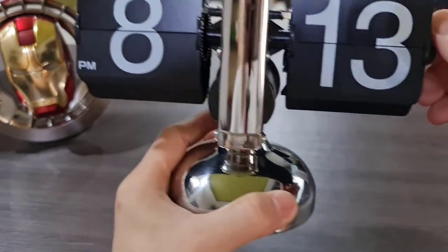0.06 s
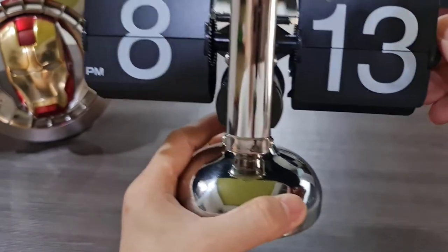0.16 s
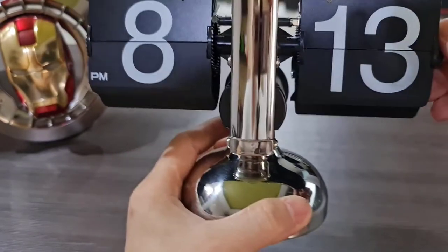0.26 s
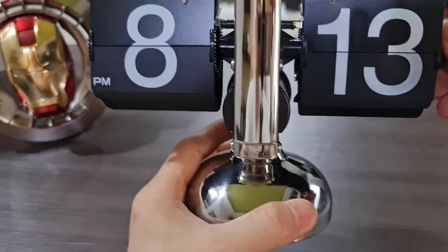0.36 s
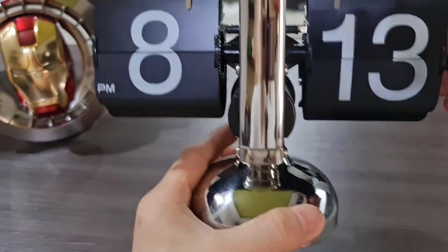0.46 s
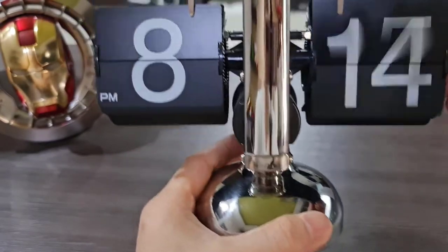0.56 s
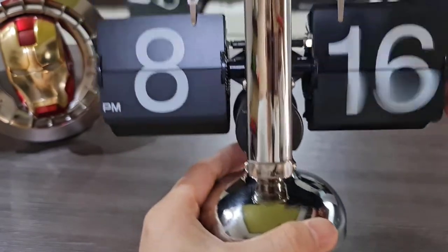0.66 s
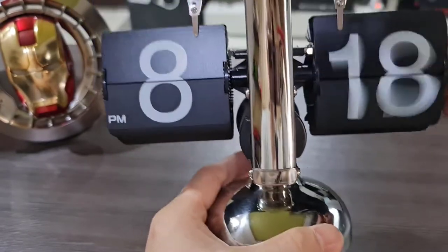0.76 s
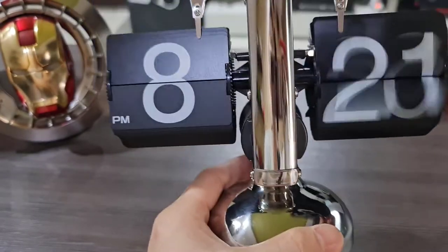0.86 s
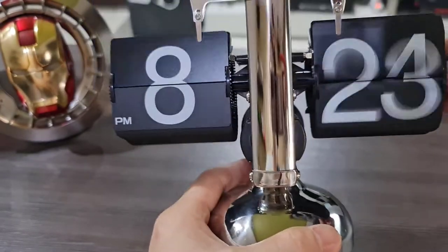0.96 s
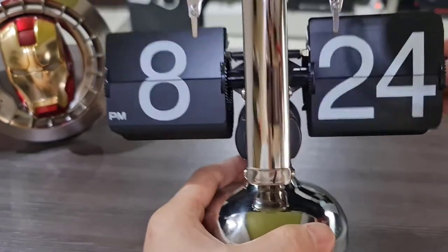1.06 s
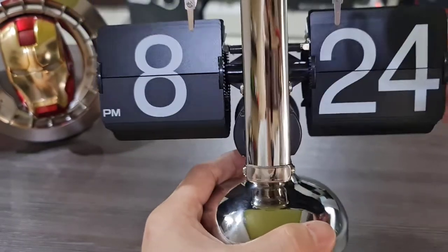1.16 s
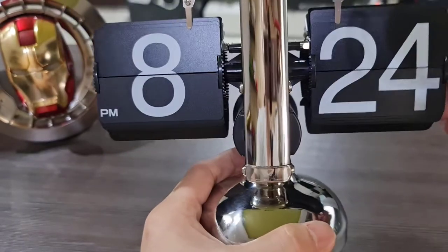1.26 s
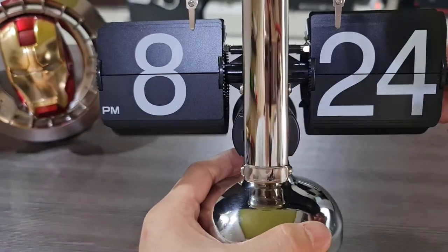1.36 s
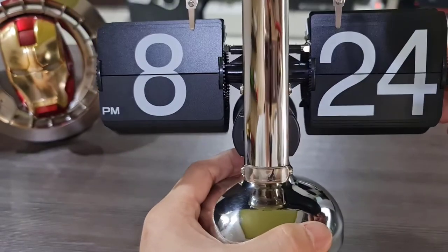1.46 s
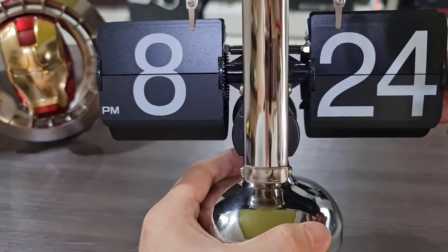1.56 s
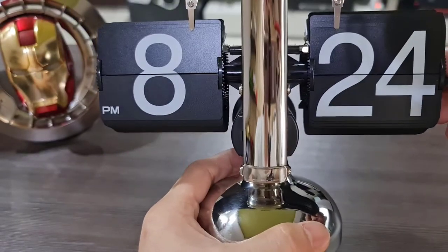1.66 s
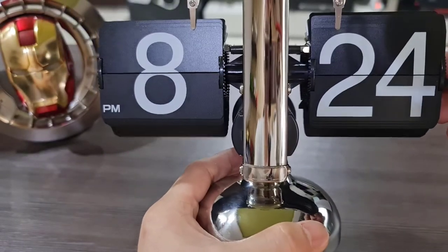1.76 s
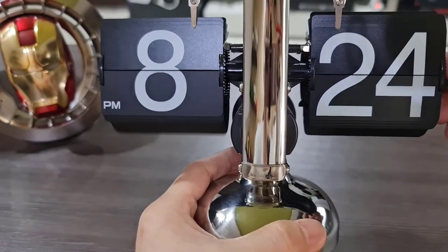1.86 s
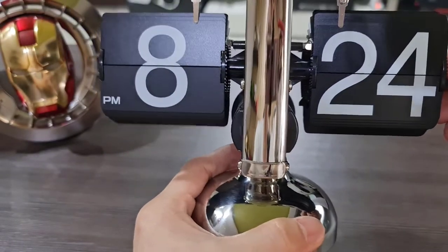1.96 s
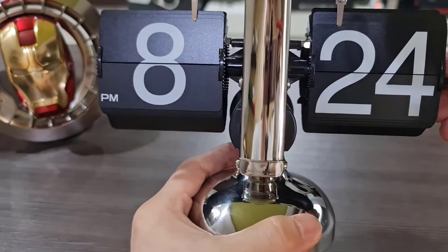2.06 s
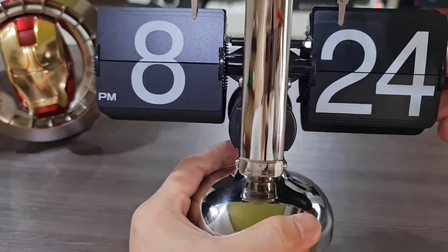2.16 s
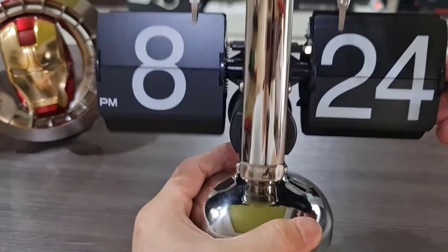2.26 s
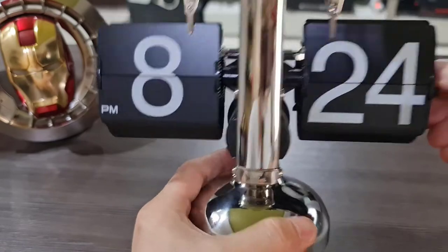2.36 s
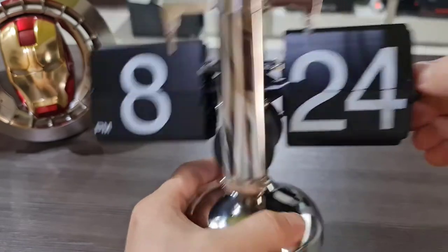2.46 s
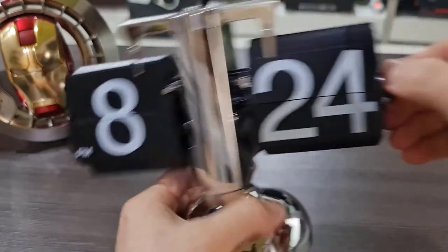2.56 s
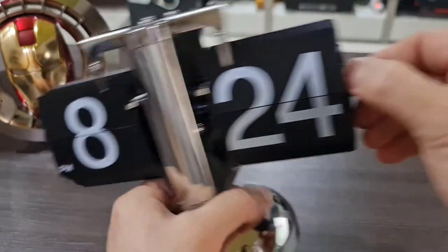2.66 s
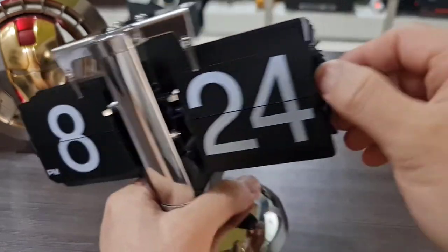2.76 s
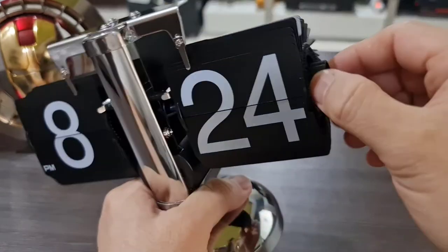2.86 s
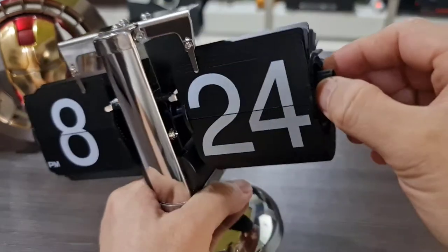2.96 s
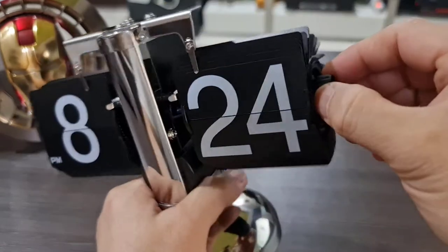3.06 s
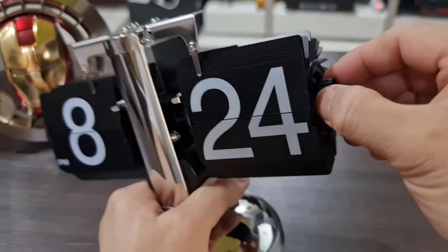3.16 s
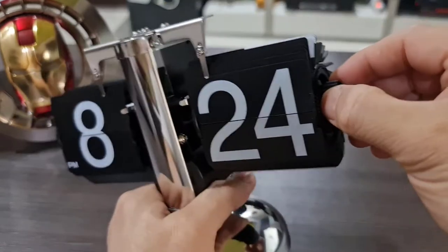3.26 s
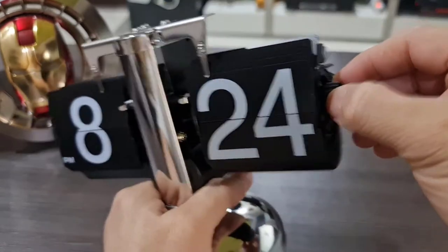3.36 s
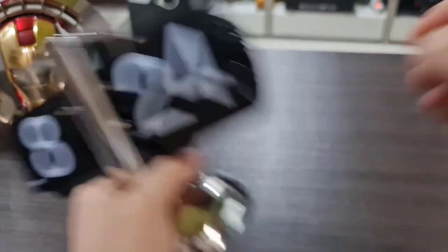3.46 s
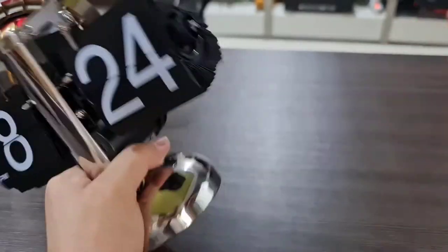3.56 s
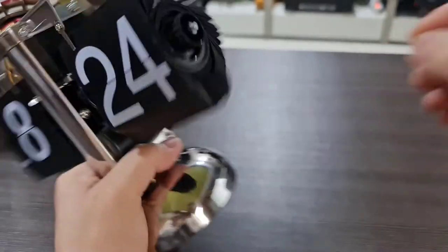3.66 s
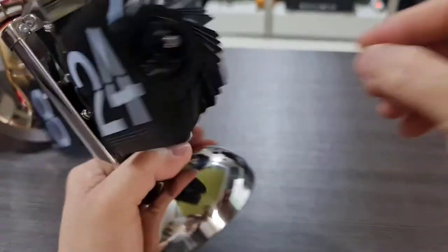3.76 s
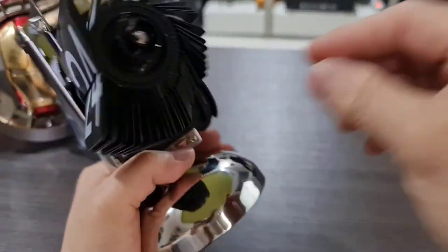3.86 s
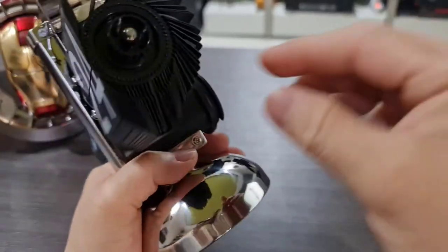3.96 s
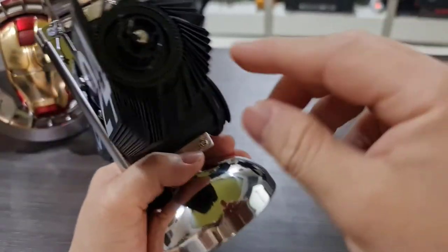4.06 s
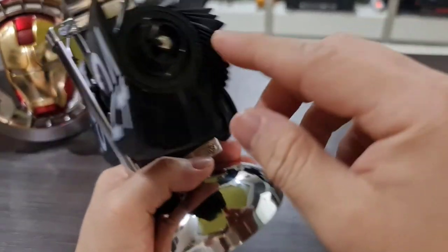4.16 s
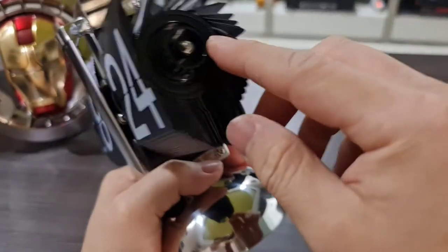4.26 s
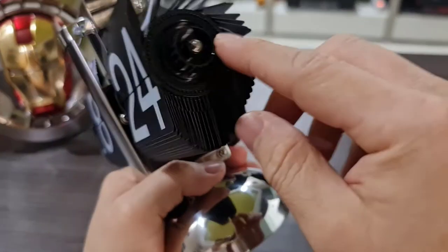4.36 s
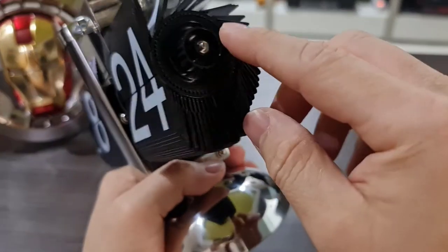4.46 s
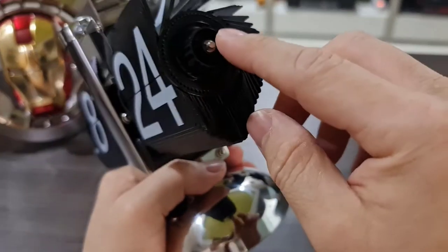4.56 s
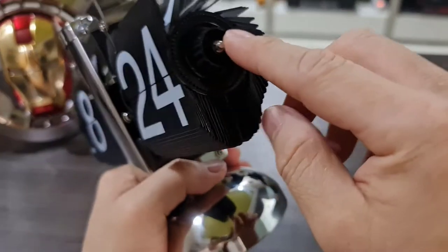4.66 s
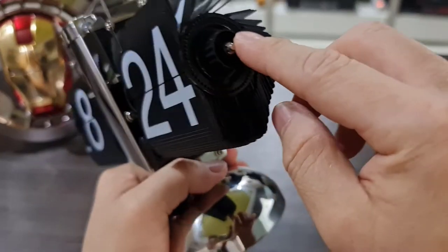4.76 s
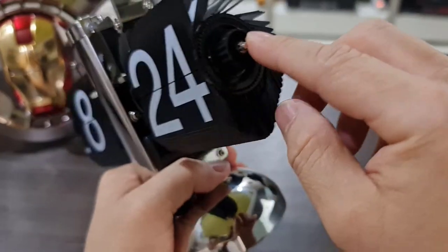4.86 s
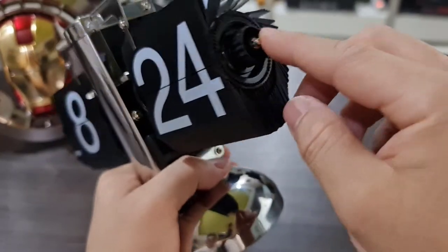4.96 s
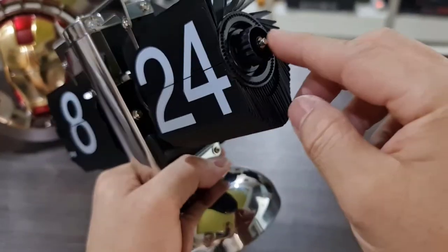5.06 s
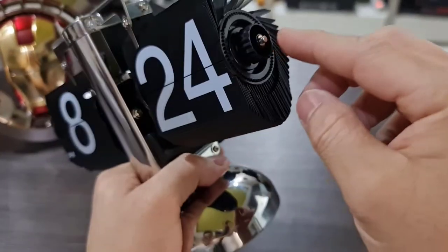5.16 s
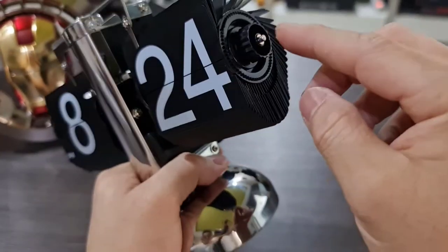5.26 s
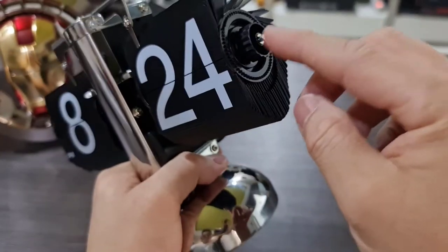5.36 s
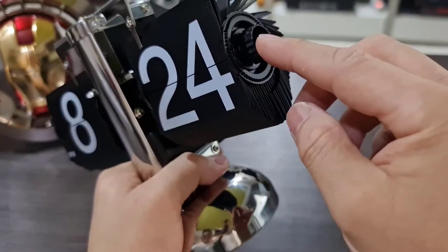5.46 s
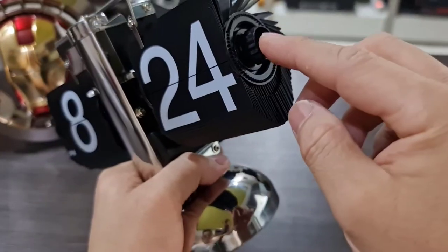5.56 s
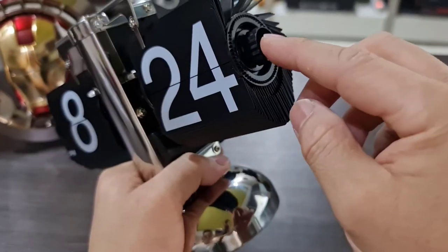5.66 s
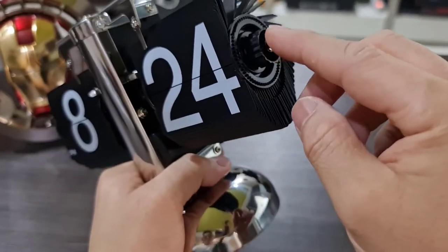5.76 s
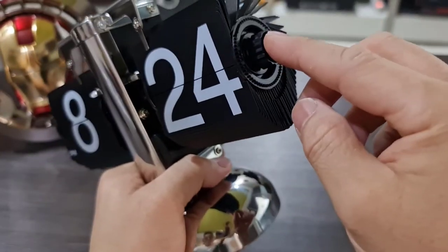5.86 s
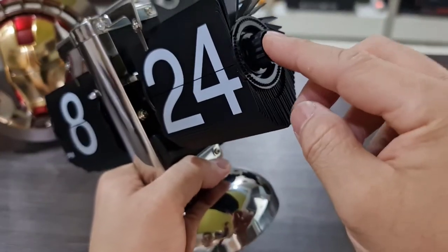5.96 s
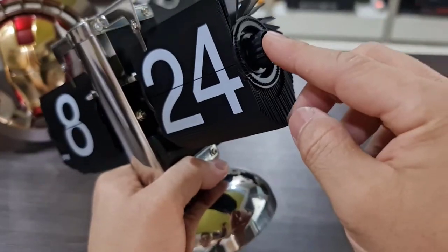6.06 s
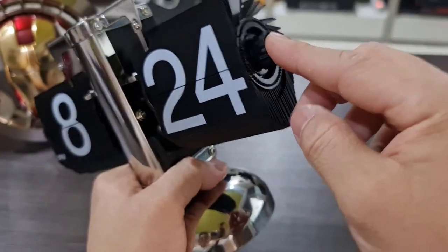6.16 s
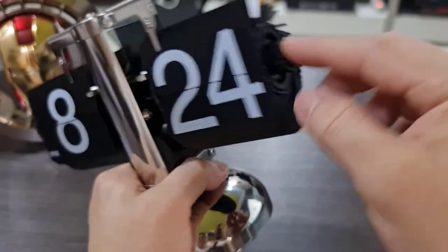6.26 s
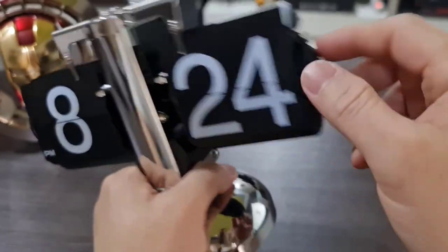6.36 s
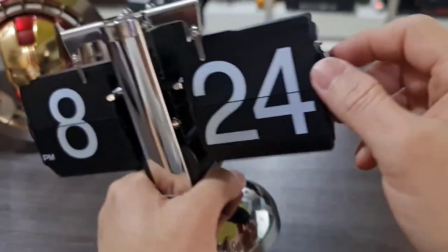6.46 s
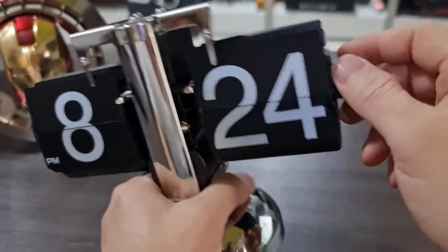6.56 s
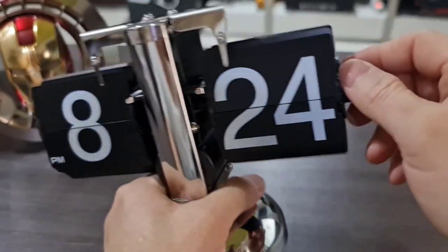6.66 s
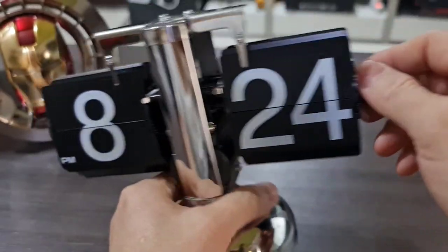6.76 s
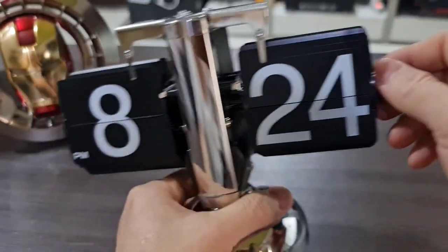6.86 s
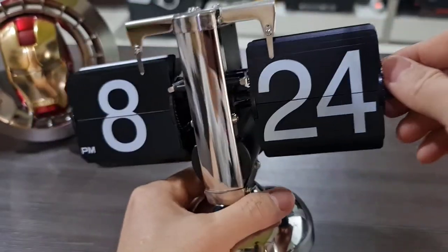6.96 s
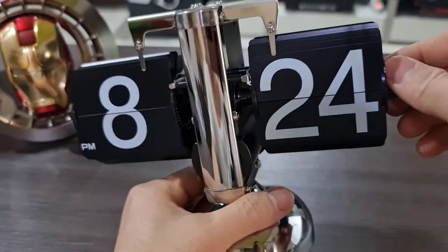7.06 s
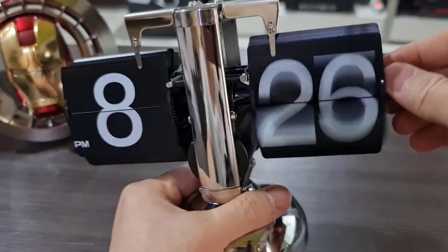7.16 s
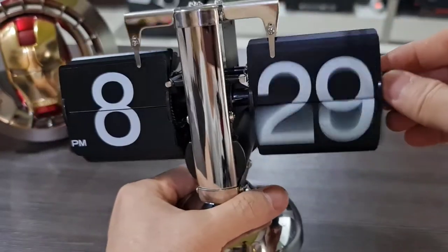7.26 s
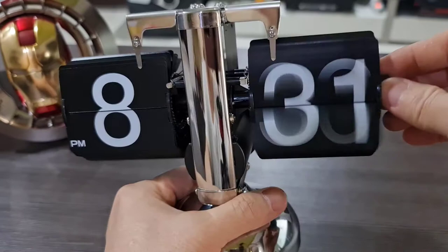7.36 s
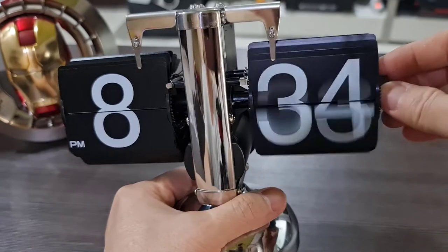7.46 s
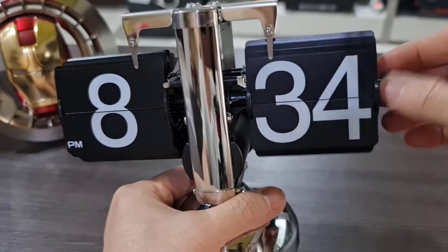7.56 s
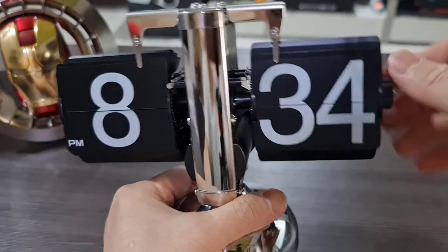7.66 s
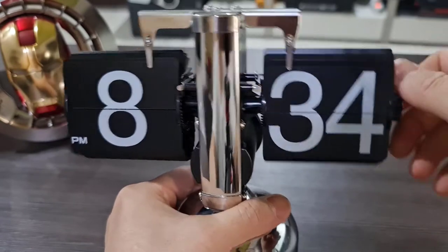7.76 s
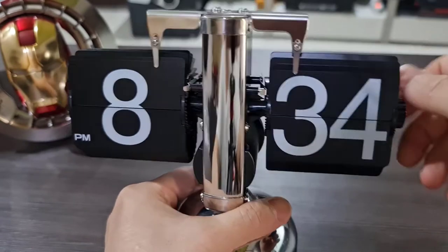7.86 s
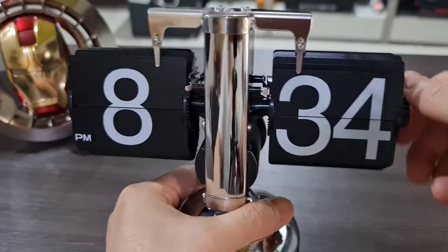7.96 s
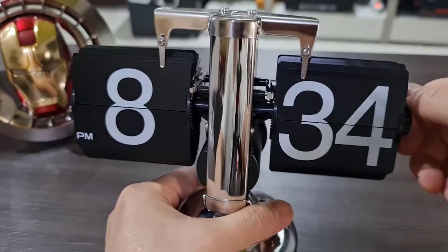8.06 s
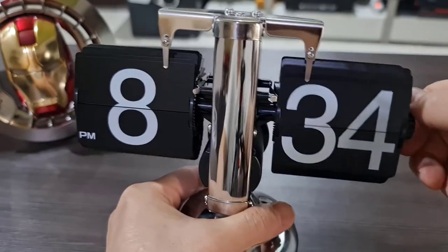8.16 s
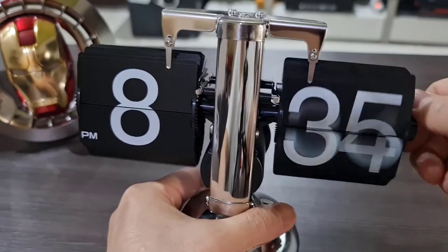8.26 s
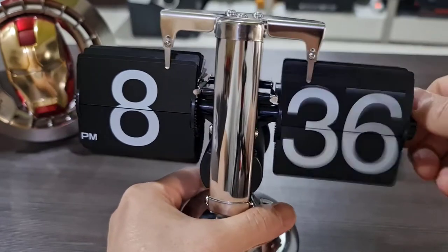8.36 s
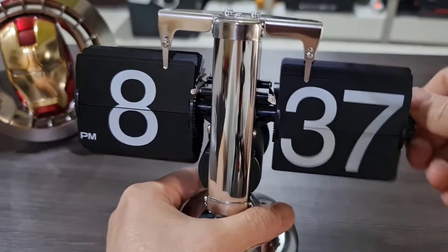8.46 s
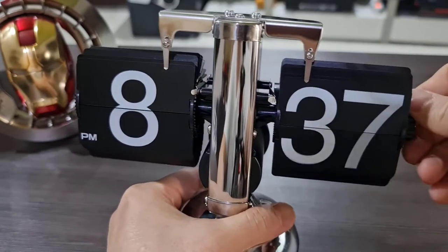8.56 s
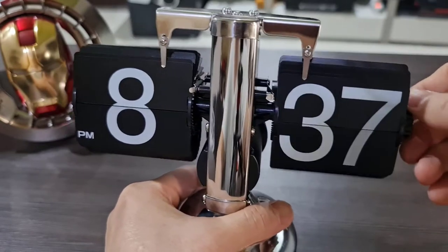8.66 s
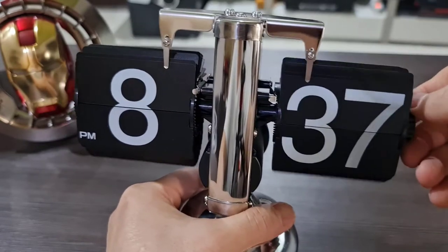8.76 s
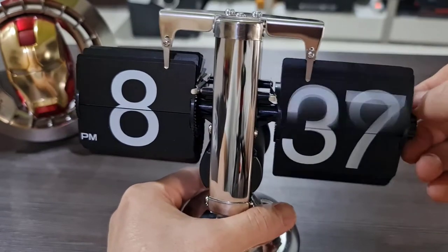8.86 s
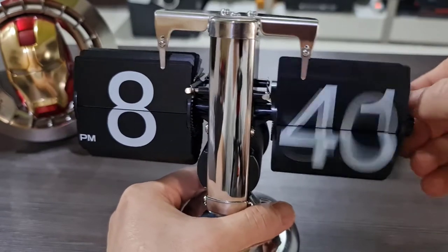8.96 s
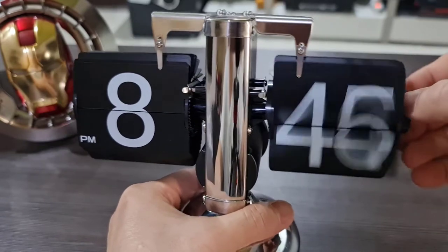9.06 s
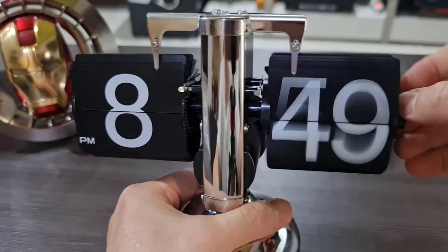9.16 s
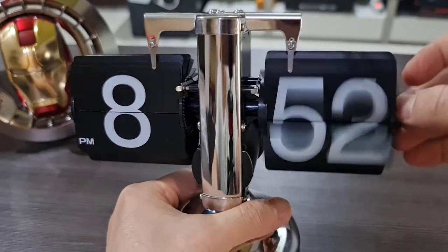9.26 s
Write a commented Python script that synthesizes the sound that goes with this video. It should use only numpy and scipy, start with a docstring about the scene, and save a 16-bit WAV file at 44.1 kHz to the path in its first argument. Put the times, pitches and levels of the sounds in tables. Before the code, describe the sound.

A small flip clock's knob is turned by hand, its plastic flaps clacking down in quick rattling runs, with ticks and one hard metallic knock indoors.

```python
"""Flip clock turned by hand

A small flip clock is held over a desk in a quiet, hard-walled room and its setting knob is turned in four runs.
Each flap snaps free of its catch and slaps down on the stack: noisy micro-impacts ring banks of resonances.
Between runs the clock ticks and creaks in the hands, fingers slide on its case, and it once takes a sharp knock.
Coloured noise makes the ventilation rumble; two microphone ports sit a few centimetres apart."""
import sys
import numpy as np
from scipy import signal
from scipy.fft import rfft, irfft, next_fast_len
from scipy.io import wavfile
from scipy.ndimage import uniform_filter1d

SR = 44100
rng = np.random.default_rng(int(sys.argv[2]) if len(sys.argv) > 2 else 0)


def unload_audio(sound):
    """Save the sound as a 16-bit wav file, at the path given as the first command line argument."""
    columns = np.transpose(np.atleast_2d(sound))
    # keep every value between -1 and 1, then stretch to whole-number steps
    steps = np.round(np.clip(columns, -1, 1) * 32767)
    wavfile.write(sys.argv[1], SR, steps.astype(np.int16))


N = 410130   # length of the scene [samples]

PORT_LIKENESS = 0.31   # share of a blow that both ports hear alike (0-1)
SNAP_LATE_S, SNAP_S = .002, 0.0002   # delay and length of the hardest moment of a contact
CREST_DB = 8   # nominal peak of a blow above its loudest millisecond
WALL_BLUR, WALL_RING_DB = 3.0, -9   # summed over all directions: short tones wider (factor), thin rings weaker


def from_db(db):
    """Decibels to amplitude factor."""
    return 10 ** (np.asarray(db) / 20)


def at_hz(points, hz):
    """Read a (frequency [Hz], value) table on a log-frequency axis."""
    table = np.array(points)
    return np.interp(np.log(np.maximum(hz, 1)), np.log(table[:, 0]), table[:, 1])


def peak_one(x):
    """Scale to peak 1."""
    return x / np.max(np.abs(x))


def unit(x):
    """Scale to energy 1."""
    return x / np.sqrt(np.sum(x ** 2))


def single_click(size):
    """One-sample impulse."""
    return np.eye(1, size)[0]


def add(track, sound, s):
    """Mix a short sound into a track at time s."""
    i = round(s * SR)
    track[..., i:i + sound.shape[-1]] += sound[..., :max(N - i, 0)]


def resonance(x, hz, width_hz):
    """Two-pole resonance, gain 1 on top."""
    r = np.exp(-np.pi * width_hz / SR)
    zeros = [(1 - r * r) / 2, 0, (r * r - 1) / 2]
    poles = [1, -2 * r * np.cos(2 * np.pi * hz / SR), r * r]
    return signal.lfilter(zeros, poles, x)


def modes(x, table, vary_db):
    """Parallel resonances with alternating signs; every blow excites them a little differently."""
    change = rng.standard_normal((len(table), 2))
    total = 0
    for k, ((hz, width, db), (level_change, pitch_change)) in enumerate(zip(table, change)):
        gain = (-1) ** k * from_db(db + vary_db * level_change)
        total = total + gain * resonance(x, hz * (1 + 0.0065 * vary_db * pitch_change), width)
    return unit(total)


def wider(table, walls, blur=WALL_BLUR):
    """The modes as the ports hear them, or blurred as the walls receive them."""
    return [(hz, width * (max(blur, 1) if walls else 1), db) for hz, width, db in table]


def contact(length_s, rise_s=0.0067, grain_db=4.0, size=4000, snap_db=-60):
    """An edge does not land at once: a burst of uneven micro-impacts that swells and dies.
    The impacts are spread along the edge, so the two ports hear them partly differently."""
    t = np.arange(size) / SR
    swell = (1 - np.exp(-t / rise_s)) * np.exp(-t / max(length_s, 5e-4))
    snap = np.exp(-((t - SNAP_LATE_S) / SNAP_S) ** 2)
    swell = swell + from_db(snap_db) * swell.max() * snap
    shared, *own = rng.standard_normal((3, len(t)))
    alike = np.clip(PORT_LIKENESS, 0, 1)
    impacts = np.sqrt(alike) * shared + np.sqrt(1 - alike) * np.array(own)
    unevenness = from_db(grain_db * rng.exponential(1, len(t)).clip(0, 4))
    return swell * impacts * unevenness


def strike(tracks, s, peak_db, body, blow, vary_db, wet_db=0):
    """Tracks 0 and 1 are what the ports hear directly. Track 2 is what the walls receive: the same energy
    summed over all directions, where the chance colour of a single blow partly evens out."""
    heard = body(blow, vary_db)
    power = np.mean(heard ** 2, axis=0)
    loudest_ms = np.sqrt(uniform_filter1d(power, size=SR // 1000).max())
    gain = from_db(peak_db - CREST_DB) / loudest_ms
    add(tracks[:2], gain * heard, s)
    to_walls = unit(body(single_click(blow.shape[1]), vary_db / 2, walls=True))
    energy = np.sqrt(np.sum(heard ** 2) / 2)
    add(tracks[2], from_db(wet_db) * gain * energy * to_walls, s + .002)


# ventilation and far hiss: (frequency [Hz], relative level [dB])
AIR_COLOUR = [(15, -74.5), (25, -45), (81, -5.5), (120, -9.5), (187, -8), (308, -3), (456, -13), (878, -9),
              (1230, -18), (2930, -34), (3700, -39.5), (6940, -35), (9500, -63), (12000, -54.5),
              (13000, -60.5)]
# what the two ports share of it: (frequency [Hz], likeness [0-1])
AIR_LIKENESS = [(25, .8), (60, .95), (125, 1), (250, .75), (500, .6), (1000, 0.7), (2500, 0), (6000, 0)]
# standing waves of the room in the rumble: (frequency [Hz], width [Hz], relative level [dB])
ROOM_STANDING_WAVES = [(100, 16, 1), (141, 18, 1.5), (192, 19, 3.5), (236, 26, -7.5), (269, 16, -5),
                       (302.5, 7, -17)]
AIR_DB, AIR_LEAD_S = -50, 0.00041   # level; head start of the left port


def air():
    """Steady coloured noise; its shared part comes from the left and reaches the right port late."""
    hz = np.arange(N // 2 + 1) * SR / N
    shared, left, right = rfft(rng.standard_normal((3, N)))
    alike = np.clip(at_hz(AIR_LIKENESS, hz), 0, 1)
    late = np.exp(-2j * np.pi * hz * AIR_LEAD_S)
    pair = np.sqrt(alike) * shared * [late ** 0, late] + np.sqrt(1 - alike) * np.array([left, right])
    humps = 1
    for top_hz, width_hz, db in ROOM_STANDING_WAVES:
        humps = humps + from_db(db + 0.5) / (1 + (2 * (hz - top_hz) / width_hz) ** 2)
    out = irfft(pair * humps * from_db(at_hz(AIR_COLOUR, hz)) * (hz > 15), N)
    balance = from_db([[-.7], [.7]])   # the right port is a little louder
    return from_db(AIR_DB) * out / out.mean(axis=0).std() * balance


# fingers sliding on the case: (time of the loudest moment [s], level [dB])
FINGER_SLIDES = [(0.046, -54), (1.3, -62), (2.643, -59.5), (2.83, -59.5), (6.34, -65), (6.39, -70),
                 (6.43, -81.5), (6.528, -68.5), (6.636, -75.5), (7.91, -65.5)]
SLIDE_RISE_DB_PER_S, SLIDE_FALL_DB_PER_S = 400, 198


def rustle():
    """Skin slips on plastic in dense tiny grains, broad and bright; each slide swells fast and fades."""
    t = np.arange(N) / SR
    level = 0
    for s, db in FINGER_SLIDES:
        below_db = np.maximum(SLIDE_RISE_DB_PER_S * (s - t), SLIDE_FALL_DB_PER_S * (t - s))
        level = level + from_db(db - below_db)
    grains = rng.standard_normal((2, N)) * from_db(5.6 * rng.exponential(1, N).clip(0, 4))
    sound = resonance(grains, 10300, 5000) + from_db(40.0) * resonance(grains, 3600, 4200)
    sound = signal.sosfilt(signal.butter(3, 12500, fs=SR, output="sos"), sound)
    return level * sound / sound.std()


# narrow rings of the frame; a tick wakes those near its pitch: (frequency [Hz], width [Hz])
FRAME_RINGS = [(1970, 30), (2400, 40), (2560, 25), (2680, 30), (2855, 7), (2897, 5), (2990, 20), (3245, 30),
               (3400, 25), (3550, 8), (3750, 22), (4021, 18), (4190, 30), (4340, 22), (4700, 40),
               (5150, 30), (5400, 40), (6280, 25)]
FRAME_REACH_DB_PER_OCTAVE = 95


def frame_ring(x, pitch_hz):
    """The frame modes fall off with their distance from the pitch of the tick."""
    total = 0
    for hz, width in FRAME_RINGS:
        db = -FRAME_REACH_DB_PER_OCTAVE * abs(np.log2(hz / pitch_hz))
        if db > -18:
            total = total + from_db(db) * unit(resonance(x, hz, width))
    return unit(total)


# flap and frame body, also heard in flaps and knock: (frequency [Hz], width [Hz], relative level [dB])
PLASTIC_BODY = [(2536, 580, -10.5), (3640, 760, -7.5), (4460, 340, -4), (5817, 820, -4.5),
                (6180, 500, -0.5), (7360, 1200, -15)]
# bright crack of the edges, also in flaps and knock: (frequency [Hz], width [Hz], relative level [dB])
EDGE_CRACK = [(9260, 210, -12), (10340, 390, -12.5), (12140, 1100, -12.5), (13970, 580, -15.5),
              (14800, 420, -15.5)]
# ticks of the clock in the hands: (time [s], nominal peak [dB], main tone [Hz], second tone [Hz],
# second tone level [dB], third tone [Hz], broad share [dB], bright share [dB], ring share [dB])
HAND_TICKS = [(0.0487, -27.5, 5850, 2920, -11, 1310, 8, -1.5, -33),
              (0.191, -40.5, 2650, 2960, -6, 1641, 9, -19, -12.5),
              (0.2151, -21.5, 5480, 1980, -3.5, 6870, -1, -7, -19),
              (0.319, -29.5, 4420, 3400, -4, 2520, 0, -15, -11),
              (0.384, -34.5, 4170, 3400, -1, 4800, -7, -37, -16.5),
              (0.4367, -24, 3960, 4700, -3, 2940, -10.5, -6, 3),
              (1.0944, -26.5, 2600, 3250, -1.5, 4000, -2, -21, -7),
              (1.776, -32.5, 5400, 1280, -1.5, 1690, -1.5, -15.5, -26),
              (2.058, -41, 3530, 4376, 5, 6200, 1, -30, -10),
              (2.064, -40, 4400, 3480, 3, 2930, -2, -30, -11),
              (2.071, -41.5, 3470, 4330, -0.5, 2680, -3.5, -31, -3),
              (2.077, -42, 2670, 4250, 0, 3530, -7, -30, -9),
              (2.149, -53, 2930, 3400, -12, 4100, -11, -40, -22),
              (2.1818, -41.5, 4100, 2980, 2, 3400, -8, -35, -16),
              (2.393, -30, 3700, 4000, 0, 3380, 2, -13.5, 0.5),
              (2.639, -42, 3466, 1781, -2, 2460, -1, -23, -20),
              (2.801, -38.5, 6000, 1921, -1, 6640, -2.5, -3, -17),
              (2.888, -36.5, 3340, 4010, -3.5, 1960, 1.5, -17, -18),
              (3.046, -36, 2940, 5900, 1, 1690, 2, -8, -8),
              (3.073, -16.5, 2873, 6300, -3.5, 1149, 1.5, -2, -6),
              (3.352, -41.5, 6000, 1932, -7, 4100, 2, -19, -13),
              (3.3624, -33, 3218, 4205, -2, 3630, 0, -14, -20),
              (3.6616, -34.5, 5730, 6336, -3, 7040, 1, -8, -12.5),
              (3.715, -39.5, 6438, 1600, 9, 4180, -0.5, -9, -21),
              (4.39, -53, 5460, 4443, -6, 6400, -6, -30, -7.5),
              (6.527, -50, 6640, 5485, -4, 4400, -5, -2, -9.5),
              (6.6258, -47.5, 4700, 3570, -6.5, 5900, -1, -26.5, -11),
              (6.6927, -40.5, 1860, 2940, -9, 1308, 3, -4.5, -23),
              (6.7067, -42.5, 2870, 1850, 0, 5184, 5, -25, -19.5),
              (7.011, -25, 4480, 5900, -15, 2670, 3.5, -10.5, -13),
              (7.088, -33.5, 4270, 4950, -3, 3859, -1, -20, -10),
              (7.578, -28, 3300, 2660, -4.5, 4300, -4, -27, -18),
              (7.7869, -36, 2460, 3280, -7, 4750, 3, -0.5, -11),
              (7.884, -47, 4200, 4980, -5, 3300, 2, -2, -14.5),
              (8.1053, -32, 1910, 5211, -9, 4460, 3, -5, -15),
              (8.179, -21.5, 3700, 2660, -2, 4370, -3, -12, -12),
              (8.223, -32, 4059, 4979, -1, 2723, -2, -6, -8),
              (8.68, -25, 2930, 4040, 2, 3290, -5, -19.5, -8.5),
              (8.8177, -25.5, 3330, 4166, 3, 2460, -1.5, -12.5, -5),
              (8.857, -30.5, 4096, 2740, -1, 3750, -8, -20, -10),
              (8.876, -28.5, 3359, 4085, 0, 1265, 4, -6, -12)]
TICK_S, TICK_RISE_SHARE = .0037, .6   # length at -33.5 dB peak; rise as a share of length
TICK_SHORTER_PER_DB = 0.12   # a harder tick is shorter: dB of length per dB of level
TICK_WIDTH_HZ, TICK_THIRD_DB = 130, -4   # width of the tones at the ports, level of the third
TICK_LOW_DB, TICK_ROOM_DB, TICK_VARY_DB = -11, -3, 4   # low housing tone, wall send, colour change


def ticks():
    """Small slips of gears, joints and fingers: three short tones, a dull broad tick, frame rings, some edge."""
    out = np.zeros((3, N))
    dull = signal.butter(4, 7000, fs=SR, output="sos")
    for s, peak_db, pitch_hz, second_hz, second_db, third_hz, broad_db, bright_db, ring_db in HAND_TICKS:
        tone_table = [(pitch_hz, TICK_WIDTH_HZ, 0), (second_hz, TICK_WIDTH_HZ, second_db),
                      (third_hz, TICK_WIDTH_HZ, TICK_THIRD_DB)]

        def body(x, vary_db, walls=False):
            tones = modes(x, wider(tone_table, walls), .5)
            housing = from_db(TICK_LOW_DB) * unit(resonance(x, 1500, 700))
            broad = from_db(broad_db) * (modes(x, wider(PLASTIC_BODY, walls, blur=5), vary_db) + housing)
            ring = from_db(ring_db + WALL_RING_DB * walls) * frame_ring(x, pitch_hz)
            edge = from_db(bright_db) * modes(x, EDGE_CRACK, vary_db)
            return tones + ring + signal.sosfilt(dull, broad) + edge

        length_s = TICK_S * from_db(-TICK_SHORTER_PER_DB * (peak_db + 33.5))
        blow = contact(length_s, TICK_RISE_SHARE * length_s, size=11000)
        strike(out, s - .001, peak_db, body, blow, TICK_VARY_DB, TICK_ROOM_DB)
    return out


# how long the walls hold the sound: (frequency [Hz], time to fall 60 dB [s])
WALL_DECAY = [(800, 0.19), (1500, 0.55), (2800, 0.55), (4400, .55), (6200, 0.64), (9000, 0.52),
              (14700, 0.066)]
# tint of the reverberation: (frequency [Hz], relative level [dB])
WALL_COLOUR = [(500, 17), (1500, 0.5), (3000, 3), (6000, -4.5), (8200, -3.5), (11000, 0.5), (15500, -3.5)]
ROOM_DB = -3.5


def room(x):
    """Diffuse reverberation: noise dying at its own rate in each half octave, unrelated in the two ports."""
    t = np.arange(int(.8 * SR)) / SR
    edges, tail = 300 * 2 ** np.arange(0, 6.1, .5), 0
    for low, high in zip(edges, edges[1:]):
        hz = np.sqrt(low * high)
        band_pass = signal.butter(2, [low, high], "band", fs=SR, output="sos")
        band = signal.sosfilt(band_pass, rng.standard_normal((2, len(t))))
        tail = tail + band * from_db(at_hz(WALL_COLOUR, hz) - 60 * t / at_hz(WALL_DECAY, hz))
    tail = tail * (1 - np.exp(-t / 0.001)) ** 2   # reflections build up over the first milliseconds
    # the tail is low-passed at 15.9 kHz
    tail = signal.sosfilt(signal.butter(8, 15900, fs=SR, output="sos"), tail)
    tail /= np.sqrt(np.sum(tail ** 2) / 2)
    return from_db(ROOM_DB) * signal.fftconvolve(x[None], tail, axes=1)[:, :N]


# a flap snaps free of the catch: (time [s], nominal peak [dB], flap pitch [Hz], pop pitch [Hz],
# pop level [dB], share of the catch's ring [dB])
FLAP_RELEASES = [(.4443,-15,4650,1260,-44,0), (.5427,-14,4500,1280,-39,-10), (.607,-16,6030,1210,-38,-12),
                 (.6626,-14.5,6120,1220,-35,-9.5), (.7136,-14.5,4300,1200,-35,-12),
                 (0.7583,-13,5950,1290,-39,-10), (0.795,-13,4430,1200,-34,-9),
                 (0.8304,-15,6000,1310,-37,-15), (.863,-13.5,4900,1300,-38,-10),
                 (.8963,-13,4500,1300,-37,-7), (0.9401,-11.5,4400,1310,-37,-8),
                 (0.9941,-10.5,4760,1300,-39,-2.5), (7.1422,-15,5660,1810,-46,-15),
                 (7.1701,-14,4500,1700,-44,-8), (7.198,-13,4400,1650,-42,-10),
                 (7.2255,-12.5,4530,1410,-42,-10), (7.2654,-12.5,4430,1400,-41,-15),
                 (7.3215,-11.5,4350,1650,-38,-12), (7.3617,-12.5,4320,1550,-38,-14),
                 (7.4038,-10.5,4500,1680,-34,-8), (7.437,-11.5,6500,1670,-31,-8),
                 (8.2403,-11.5,4020,1810,-37,-15), (8.2889,-11,3600,1730,-43,-18)]
# a flap slaps down on the stack; when the clock leans back, release and slap merge into one:
# (time [s], nominal peak [dB], flap pitch [Hz], pop pitch [Hz], pop level [dB])
FLAP_LANDINGS = [(0.4694, -11.5, 4400, 1290, -29.5), (0.5574, -13.5, 5470, 1300, -28),
                 (0.5627, -20, 4360, 1340, -45), (0.623, -11.5, 6150, 1230, -27),
                 (0.6757, -12, 6100, 1210, -23.5), (0.723, -13.5, 4310, 1220, -26.5),
                 (0.7684, -13.5, 6050, 1230, -23.5), (0.8046, -11.5, 4450, 1310, -24),
                 (0.8394, -15, 4510, 1290, -30), (0.8706, -12.5, 6200, 1310, -27.5),
                 (0.9076, -13, 4470, 1310, -25.5), (0.95, -12, 4440, 1310, -23.5),
                 (7.1149, -13.5, 4320, 1700, -34.5), (7.1501, -15.5, 4430, 1520, -47),
                 (7.1759, -15.5, 4320, 1680, -41), (7.2031, -15, 4330, 1650, -38),
                 (7.2341, -13, 4700, 1420, -37), (7.2728, -11, 4350, 1890, -33),
                 (7.3275, -12, 4380, 1700, -30.5), (7.367, -12.5, 4410, 1420, -33),
                 (7.407, -10, 6350, 1700, -29), (7.4419, -12, 4600, 1920, -33),
                 (8.2432, -11, 4550, 1840, -33), (8.2921, -13.5, 4500, 1700, -32),
                 (8.3685, -8.5, 4560, 1650, -33), (8.4327, -10.5, 4240, 1940, -31),
                 (8.8982, -12, 4070, 1630, -31), (8.9289, -12, 4200, 1600, -35),
                 (8.9563, -8.5, 4670, 1870, -33), (8.984, -11, 4230, 1960, -33),
                 (9.0085, -10, 6300, 1920, -30), (9.0296, -10, 6460, 1780, -32),
                 (9.0492, -11.5, 6550, 1730, -31), (9.07, -11, 4470, 1890, -25.5),
                 (9.086, -8.5, 5900, 1990, -30), (9.103, -11, 6040, 1920, -28.5),
                 (9.1316, -12.5, 4650, 1800, -31), (9.1655, -10, 4670, 1780, -32),
                 (9.197, -10.5, 4400, 1750, -36), (9.2311, -8, 4400, 1780, -37),
                 (9.2586, -8, 4000, 1900, -29), (9.2815, -11.5, 4350, 1830, -32),
                 (9.2918, -9.5, 4330, 1510, -33)]
# how the clock is held in each run: (start time [s], send to the walls [dB], change of body below 4 kHz [dB])
KNOB_RUNS = [(0.3, -2.0, -3), (7.05, -1, -3.5), (8.15, -2.5, -2), (8.7, 0, -3)]
EDGE_DB, RELEASE_EDGE_DB = -4, 0.5   # mean share of the bright edge crack; a release is brighter by this
CATCH_DB = -20   # share of the catch's ring in a landing
RELEASE_RISE_S, LANDING_RISE_S = 0.0034, 0.0019   # a release scrapes in, a landing is abrupt
SETTLE_S, SETTLE_DB, SETTLE_SPREAD_DB = .035, -18, 3.0   # settling touches: latest delay, mean level, spread


def flap_contacts():
    """Every release and landing, and the two small touches with which the stack settles after a landing.
    Rows: (time [s], peak [dB], flap [Hz], pop [Hz], pop [dB], catch [dB], edge [dB], rise [s],
    wall send [dB], low body [dB])."""
    rows = [(*row, EDGE_DB + RELEASE_EDGE_DB, RELEASE_RISE_S) for row in FLAP_RELEASES]
    landing = (CATCH_DB, EDGE_DB, LANDING_RISE_S)
    for s, db, flap_hz, pop_hz, pop_db in FLAP_LANDINGS:
        rows.append((s, db, flap_hz, pop_hz, pop_db, *landing))
        for late, size in zip(rng.uniform(.2, 1, 2), rng.standard_normal(2)):
            less_db = SETTLE_DB + SETTLE_SPREAD_DB * size
            rows.append((s + SETTLE_S * late, db + less_db, flap_hz, pop_hz, pop_db + less_db, *landing))
    starts = np.transpose(KNOB_RUNS)[0]
    return [(*row, *KNOB_RUNS[np.searchsorted(starts, row[0]) - 1][1:]) for row in rows if row[0] < N / SR]


# the free tip of the catch sings on, thinly: (frequency [Hz], width [Hz], level [dB])
CATCH_TIP = [(4560, 4, 3), (4630, 4, 5), (4718, 4, 5)]
CATCH_HZ, CATCH_WIDTH_HZ = 4680, 55
FLAP_DB, FLAP_WIDTH_HZ = -6, 140   # share of a flap's own bending mode, and its width at the ports
EDGE_SPREAD_DB, SNAP_DB = 3.5, 1.5   # edge change between contacts; share of the hardest moment
POP_CREST_DB, POP_WIDTH_HZ, POP_LATE_S = 3, 328, 0.000964   # peak above level, width of each of two stages, delay


def flaps():
    """Each contact rings body, flap, catch and bright edge; air squeezed between flaps gives a hollow pop."""
    out, click = np.zeros((3, N)), single_click(1500)
    for s, peak_db, flap_hz, pop_hz, pop_db, catch_db, edge_db, rise_s, wet_db, warm_db in flap_contacts():
        held = [(hz, width, db + warm_db * (hz < 4000)) for hz, width, db in PLASTIC_BODY]
        edge_db = edge_db + EDGE_SPREAD_DB * rng.standard_normal()

        def body(x, vary_db, walls=False):
            housing = from_db(-11.5) * unit(resonance(x, 1600, 1206))   # the drum housing answers faintly
            flap_width_hz = FLAP_WIDTH_HZ * (WALL_BLUR if walls else 1)
            flap = from_db(FLAP_DB) * unit(resonance(x, flap_hz, flap_width_hz))
            catch = unit(resonance(x, CATCH_HZ, CATCH_WIDTH_HZ))
            catch = from_db(catch_db + WALL_RING_DB * walls) * catch
            edge_and_body = modes(x, held, vary_db) + from_db(edge_db) * modes(x, EDGE_CRACK, vary_db)
            return edge_and_body + housing + flap + catch

        blow = contact(0.0034, rise_s, size=3200, snap_db=SNAP_DB)
        strike(out, s - .001, peak_db, body, blow, 3.24, wet_db)
        pop = peak_one(resonance(resonance(click, pop_hz, POP_WIDTH_HZ), pop_hz, POP_WIDTH_HZ))
        facing_db = np.array([[0], [0], [-8]])   # the pop faces the ports more than the walls
        add(out, from_db(pop_db + POP_CREST_DB + facing_db) * pop, s + POP_LATE_S)
    heard = out[:2] + 1e-18   # tiny offset keeps the filters out of denormal numbers
    out[:2] += sum(from_db(db) * resonance(heard, hz, width) for hz, width, db in CATCH_TIP)
    return out


def puffs():
    """A falling flap pushes air: a soft, very low swell for every release and landing."""
    t, out = np.arange(4000) / SR, np.zeros(N)
    push = peak_one(np.sin(2 * np.pi * 30 * t) * np.exp(-t / 0.017))
    for s, peak_db, *_ in FLAP_RELEASES + FLAP_LANDINGS:
        add(out, from_db(peak_db - 48.5) * push, s)
    return out


# hollow metal base, struck by the knock: (frequency [Hz], width [Hz], relative level [dB])
METAL_BASE = [(1466, 440, -11.5), (3680, 990, -12.5), (5300, 160, -0.5), (6490, 310, -2.5), (7200, 380, -7),
              (9650, 160, -12)]
# steel column, with a beating pair: (frequency [Hz], width [Hz], relative level [dB])
STEEL_COLUMN = [(1986, 20, -19), (3596, 10, -20), (5540, 5, -2), (5582, 4, 0), (9620, 6, -12)]
# what the knock leaves ringing in the desk: (frequency [Hz], relative level [dB], time to fall 60 dB [s])
DESK_BOOM = [(35, -2, .3), (54, 5.5, 0.14), (64, 6, .12), (76, 9.5, 0.15), (94.9, 11.5, 0.23),
             (109.2, 7.5, 0.326)]
KNOCK_S, KNOCK_DB, KNOCK_RING_DB = 3.4005, 0.5, -29   # time, nominal peak, reference level of the desk boom
COLUMN_DB = -12.5   # share of the column in the direct knock


def knock():
    """A light first touch, a hard crack that sets the steel column ringing, and the boom of the desk after it."""
    crack, boom = np.zeros((3, N)), np.zeros(N)

    def body(x, vary_db, walls=False):
        broad = from_db(-9.5) * unit(resonance(x, 6500, 3500))
        base = modes(x, wider(METAL_BASE, walls, blur=4.6), 0.45)
        plastic = from_db(-18.0) * modes(x, PLASTIC_BODY, vary_db)
        edge = from_db(-6.5) * modes(x, EDGE_CRACK, vary_db)
        column = from_db(COLUMN_DB + 2 * WALL_RING_DB * walls) * modes(x, STEEL_COLUMN, 0)
        return broad + base + plastic + edge + column

    strike(crack, KNOCK_S - .0095, KNOCK_DB - 16, body, contact(.005, size=12000), 1.5)
    hard_blow = contact(0.0024, rise_s=.0003, grain_db=4.0, size=30000)
    strike(crack, KNOCK_S, KNOCK_DB, body, hard_blow, 2.4, -2.3)
    # small parts radiate no bass
    crack = signal.sosfilt(signal.butter(3, 1050, "high", fs=SR, output="sos"), crack)
    t = np.arange(SR) / SR
    for hz, db, t60 in DESK_BOOM:
        # minus: the desk is pushed away first
        swing = -np.sin(2 * np.pi * hz * t) * (1 - np.exp(-t / 0.015))
        add(boom, from_db(KNOCK_RING_DB + db - 60 * t / t60) * swing, KNOCK_S + 0.0043)
    return crack, boom


# colour difference of the ports: (frequency [Hz], left minus right [dB])
PORT_SHADE = [(100, -3), (500, 1.5), (1500, 1), (4000, -0.5), (6000, -0.5), (9000, -2.5), (14000, -7)]
CLOCK_LEAD_S = 8e-5   # head start of the left port


def ports(pair):
    """The left port hears the clock a little earlier, and the treble duller."""
    size = next_fast_len(N + 8192)
    hz = np.arange(size // 2 + 1) * SR / size
    half = from_db(at_hz(PORT_SHADE, hz) / 2)   # each port takes half the difference
    late = np.exp(-2j * np.pi * hz * CLOCK_LEAD_S)
    return irfft(rfft(pair, size) * np.array([half, late / half]), size)[:, :N]


def scene():
    """Clock and its reverberation at the two ports, over the room air."""
    crack, boom = knock()
    clock = flaps() + ticks() + crack
    at_ports = clock[:2] + boom + puffs() + rustle() + room(clock[2])
    return ports(at_ports) + air()


def record(dry):
    """The highest peaks are rounded, the top is cut steeply."""
    rounded = np.tanh(dry / 1.1) * 1.1
    steep_cut = signal.cheby2(12, 60, 16990, fs=SR, output="sos")   # 60 dB down from 16990 Hz
    return signal.sosfilt(steep_cut, rounded)


dry = scene()
out = record(dry)
unload_audio(out)
```